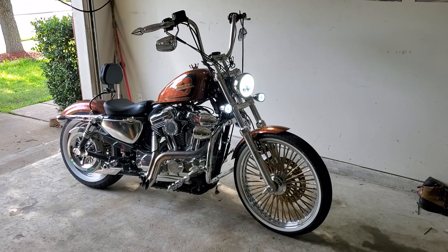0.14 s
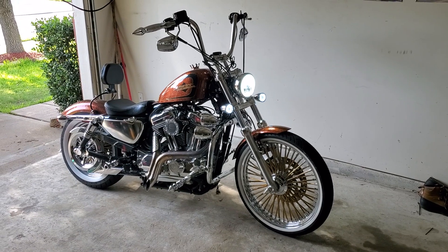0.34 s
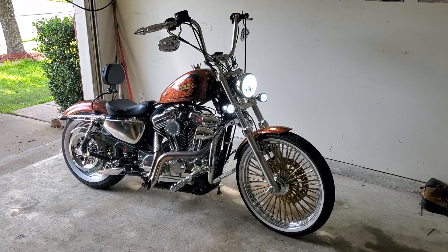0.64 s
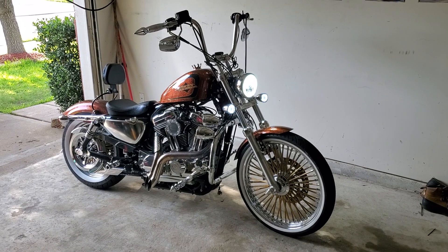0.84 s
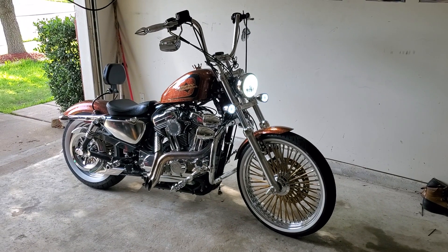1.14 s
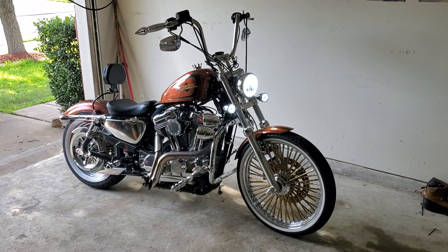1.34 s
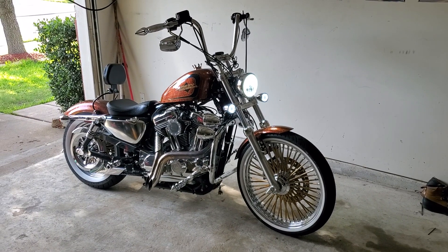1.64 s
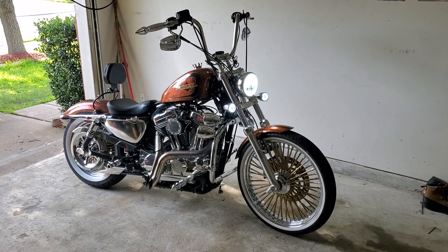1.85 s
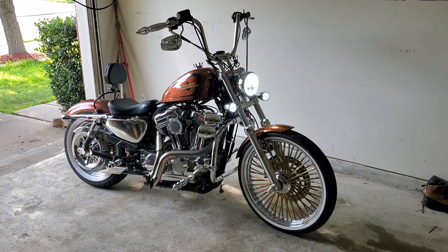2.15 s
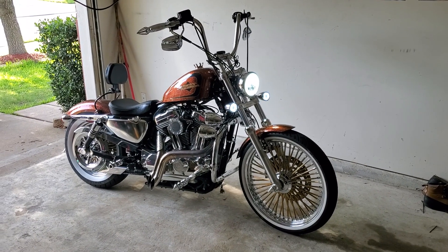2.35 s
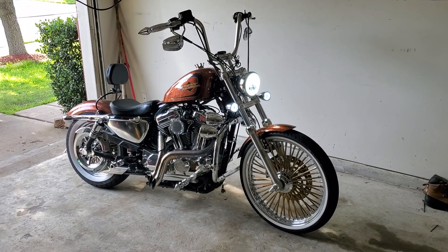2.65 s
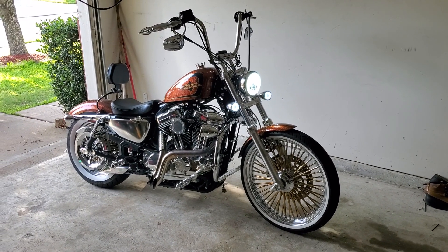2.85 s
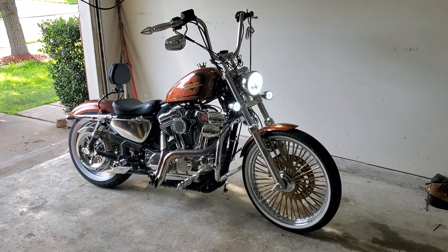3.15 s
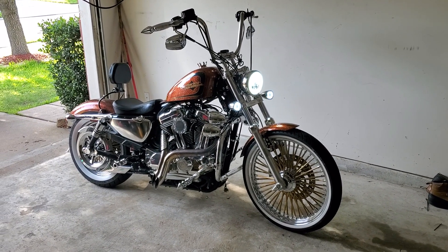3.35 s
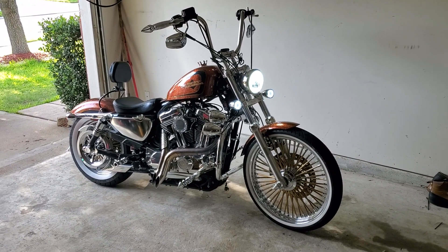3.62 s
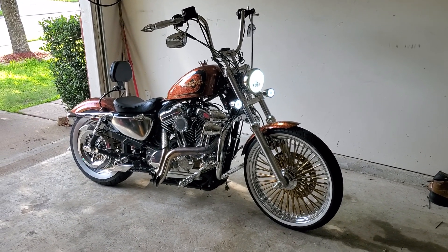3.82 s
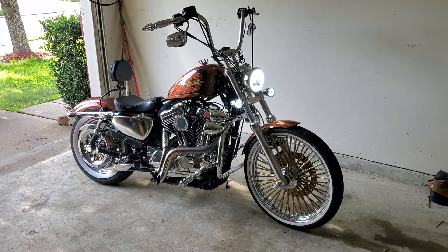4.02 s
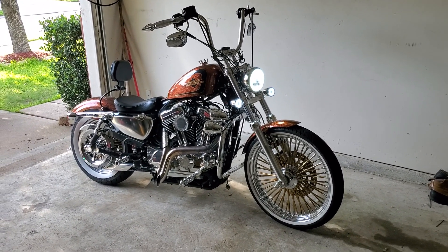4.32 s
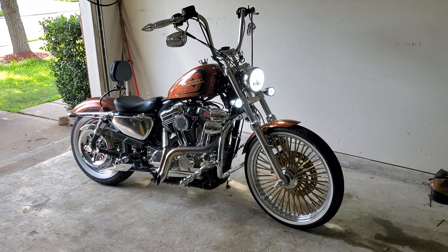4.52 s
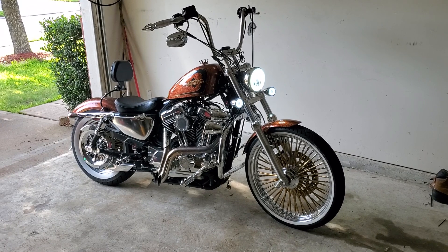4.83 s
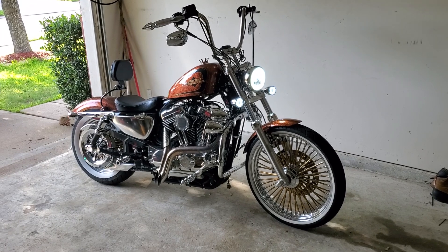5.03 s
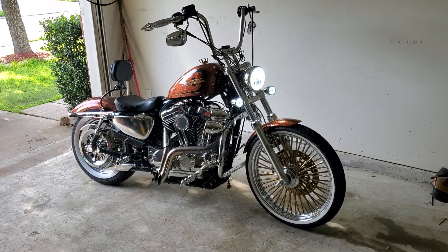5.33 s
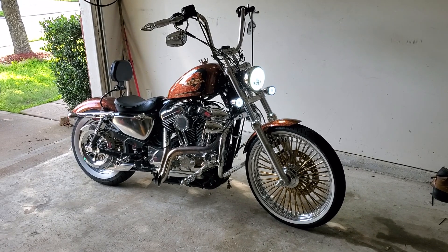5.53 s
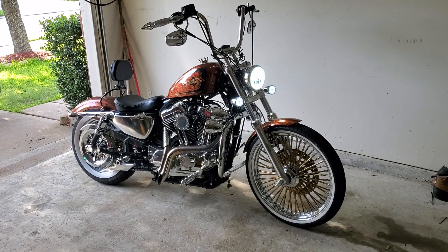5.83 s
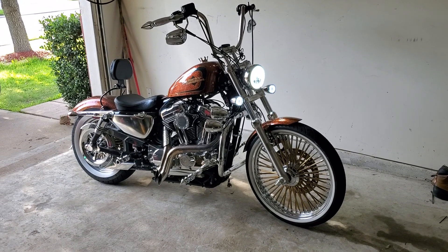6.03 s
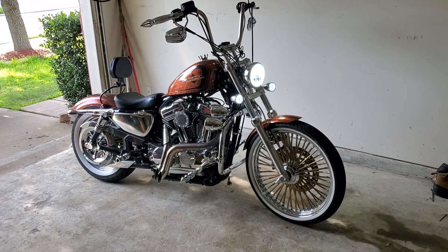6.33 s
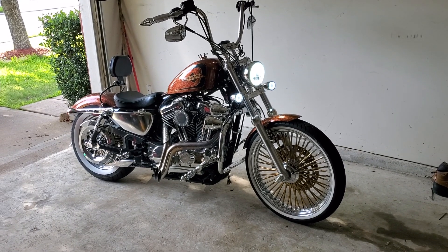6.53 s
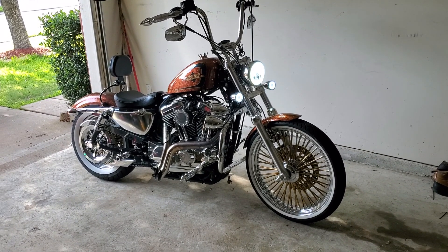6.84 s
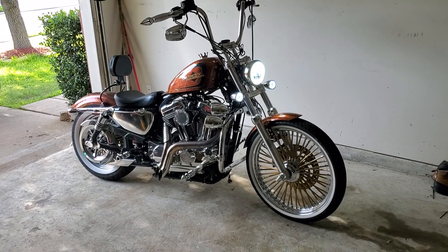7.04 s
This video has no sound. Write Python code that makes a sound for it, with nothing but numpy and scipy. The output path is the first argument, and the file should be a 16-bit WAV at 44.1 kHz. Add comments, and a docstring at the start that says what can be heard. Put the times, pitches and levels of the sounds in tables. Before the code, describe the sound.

Close, loud motorcycle idle with a lopsided galloping beat, low booming thumps, gritty pops, occasional misfires and hard metallic knocks echoing in a concrete garage.

```python
"""A big air-cooled V-twin motorcycle idles in an open garage, a few metres from two microphones.
In each cycle the front cylinder fires, then the rear: a thump rings the pipe, gas barks and cracks, metal clacks.
The walls answer within about a tenth of a second, valves tick, and late in the cycle the intake gulps; gears rustle on.
At first the rear cylinder alternates full bangs with weak firings and misses; near 4 s it has no bangs and
the front one knocks hard; from about 5 s the bangs return, and weaken towards the end."""
import sys
import numpy as np
from scipy import signal
from scipy.fft import rfft, irfft, next_fast_len
from scipy.io import wavfile
from scipy.ndimage import map_coordinates

SR = 44100
rng = np.random.default_rng(int(sys.argv[2]) if len(sys.argv) > 2 else 0)


def master_out(mix):
    """Clip the mix to full scale and print it as 16-bit PCM to the path in sys.argv[1]."""
    frames = np.transpose(np.atleast_2d(mix))
    ceiling = np.clip(frames, -1, 1)
    pcm = np.round(ceiling * 32767).astype(np.int16)
    wavfile.write(sys.argv[1], SR, pcm)


N = 316220

IDLE_RPM = 1002.84  # each cylinder fires once in two turns
VEE_DEG = 321  # crank angle by which the rear cylinder follows the front
FORCE_SCATTER_DB, THUMP_SCATTER_DB = 0.53, 1.04  # standard deviations: force, and thump alone
BOOM_LAG_S, KNOCK_LAG_S, GAS_LAG_S = -.00009, .00018, .00022  # by which the left microphone leads
TOP_HZ = 16050  # upper limit of the band

# Hunting of the idle: how far the crank runs ahead of a steady beat [t/s, lead/s]
IDLE_HUNT = [(0, .048), (.43, .0535), (.8, .054), (1.2, .051), (1.45, .053), (1.87, .047), (2, .041),
             (2.4, .0435), (3.2, .044), (3.55, .0505), (4.45, .0412), (4.72, .0418), (4.87, .038),
             (5.47, .038), (5.85, .0468), (6.18, .046), (6.88, .0575), (7.13, .0494)]
# Ordinary firing of each cylinder, relative levels [thump level/dB, bark level/dB, crack level/dB, clack level/dB]
FRONT_FIRING = (-0.54, -20, -27, -23.5)
REAR_FIRING = (-0.5, -37, -52.5, -57)
# Full bang of the rear cylinder, relative levels [thump level/dB, bark level/dB, crack level/dB, clack level/dB]
REAR_BANG = (0.94, -19.5, -23, -18.5)
# Growth per dB of force [thump dB/dB, bark dB/dB, crack dB/dB, clack dB/dB]
FORCE_STEEPENING = (.05, 1, 1.3, 2.1)
# Bangs of the rear cylinder, mostly on every second cycle [t/s, force level/dB]
REAR_BANGS = [(.008, -2.5), (0.2411, -0.5), (.476, -3.5), (0.7193, -7.5), (.956, -6), (1.077, -4.5),
              (1.317, -1), (1.5578, -1.5), (1.798, -7.5), (2.046, 0), (2.2834, -0.2), (2.521, -3),
              (2.6409, -5), (2.8815, 1), (3.239, -2.5), (3.473, -2.5), (3.712, -10), (4.921, -2.5),
              (5.158, -8), (5.278, -8), (5.5218, 0), (5.7495, 1.1), (5.9893, 2), (6.226, -1), (6.462, -3),
              (6.702, -5.5), (6.936, -12.5)]
# Spent gas left by a bang weakens the next thump of each cylinder [front change/dB, rear change/dB]
SPENT_GAS = (-0.6, -3)
# Misses of the rear cylinder, holes in the beat [t/s, change of thump level/dB]
REAR_MISSES = [(.12, -15), (.36, -4), (1.2, -8), (1.44, -14), (2.16, -6), (2.4, -27), (2.76, -12), (3, -22),
               (5.87, -5), (6.11, -11), (6.35, -19)]
# Hard knocks of the front cylinder [t/s, extra bark level/dB, extra clack level/dB]
FRONT_KNOCKS = [(.425, 3.5, 7.5), (0.547, -2.5, 5), (.904, 3, -1), (1.2658, 0.5, 5.5), (1.8674, -1.5, 6.5),
                (2.231, 3.5, -2), (2.5897, 2.5, 1), (2.8283, 1.5, 8.5), (3.4215, -1.5, 5.5),
                (3.5399, 1.5, 7), (3.902, 7, 8), (4.1426, -2.5, 10), (4.3869, 2, 4), (4.6248, 3, 3),
                (4.8686, 3.5, -2), (5.2275, -2, 5.5), (6.2932, 3, 2), (6.5294, 0.5, 6), (7.0065, 4.5, -1)]
# Puffs of the front cylinder [t/s, force level/dB]
FRONT_PUFFS = [(1.383, -1), (1.503, -4), (2.467, -8), (3.065, -4.5), (3.657, -9.5), (3.7833, -1.5),
               (5.1062, -1.5), (5.344, -8.5), (5.4698, -0.5), (5.703, -9.5), (6.179, -15), (6.883, -1.5)]
# Slow swell and sag of the thump [t/s, change of level/dB]
THUMP_SWELL = [(0, -0.3), (1.8, -0.4), (3.4, -0.7), (4, 0.2), (4.8, .8), (5.6, -1), (6.6, -0.3), (7, 1.2)]
# Resonances of the two exhaust pipes [f/Hz, width/Hz, relative level/dB]
FRONT_COLUMN = [(104.5, 29, 11.5), (137.7, 28, 11.4), (185, 13, 3.5), (245.5, 12, -1.5)]
REAR_COLUMN = [(112, 90, 7.9), (165, 71, 15.9), (177, 48, 15), (255, 13, 6.5)]
# Echoes of the thump from floor, walls and ceiling [delay t/s, gain]
WALL_ECHOES = [(0.0023, 0.58), (0.0143, 0.63), (0.0169, 0.81), (0.023, 1.2), (0.0282, 0.81), (0.0318, 0.68),
               (0.05, 0.69), (0.0561, 0.6), (0.064, 0.5), (0.0716, 0.32), (0.0766, 0.3), (0.081, 0.31),
               (0.0914, 0.19), (0.1054, 0.26)]
# Spectra of the gas noises [f/Hz, relative level/dB]
BURBLE_SPECTRUM = [(160, -21), (250, 5.5), (325, 0.5), (420, -2.5), (505, 0.5), (570, -17), (650, 4.5),
                   (900, -28)]
BARK_SPECTRUM = [(300, -20), (560, -27), (770, -10), (900, -12), (1030, -19.5), (1180, -7), (1420, -6.5),
                 (1740, 1.5), (2100, 2), (2650, -0.5), (3400, -16), (5000, -23), (9000, -31)]
CRACK_SPECTRUM = [(1800, -0.5), (3200, 5), (4200, -3), (5500, 0.5), (6300, -1), (7400, 3.5), (8900, -8),
                  (10800, 2), (13200, -7.5), (16000, -7)]
# Spectrum of the air drawn through the filter box [f/Hz, relative level/dB]
INTAKE_SPECTRUM = [(350, -42), (640, 13), (780, 28), (1000, -16), (2000, -55)]
# Spectrum of the gears and chain [f/Hz, relative level/dB]
GEAR_SPECTRUM = [(30, -6), (200, -16), (500, 11), (1000, 3.5), (2000, 9.5), (4000, -6), (7000, -4),
                 (9000, -19), (11000, -9.5), (16000, -34)]
# Modes of the cooling fins and cases [f/Hz, relative level/dB, T60 t/s]
FIN_MODES = [(1005, -30, 0.44), (1832, 8.5, 0.059), (1600, -21, 0.2), (1860, 5, .2), (2026, 10, 0.11),
             (2322, 0, 0.83), (2630, -26, 0.24)]
# Reverberation time of the garage [f/Hz, T60 t/s]
GARAGE_T60 = [(150, 1), (600, 0.75), (2000, 0.43), (6000, 0.42), (14000, 0.35)]
# Colour of the two microphones [f/Hz, left minus right level/dB]
MICROPHONES = [(80, .1), (115, 1), (170, .2), (250, -.7), (320, -2.7), (470, -2), (670, 2.5), (850, 0),
               (1020, 2), (1790, -2), (2740, 1.5), (4190, 7), (6410, 7.5), (8200, 7.5), (9810, 2.5),
               (14000, -2)]
# Slow drift of the top treble [t/s, level/dB]
TREBLE_DRIFT = [(0, -4), (1.2, -4.5), (2.501, -4), (3.799, -3), (4.8, 3), (5.8, -1.5), (6.5, -0.5),
                (7.17, -1.5)]


def firings():
    """Crank kinematics: one row [t/s, thump, bark, crack, clack level/dB] for each firing, front and rear."""
    cycle_s = 2 * 60 / IDLE_RPM
    beat = np.arange(0, N / SR + cycle_s / 2, cycle_s)
    front_s = beat - np.interp(beat, *np.transpose(IDLE_HUNT))
    rear_s = front_s + cycle_s * VEE_DEG / 720
    steepening = np.array(FORCE_STEEPENING)
    chance = rng.standard_normal((len(beat), 4))
    front = FRONT_FIRING + FORCE_SCATTER_DB * np.outer(chance[:, 0], steepening)
    rear = REAR_FIRING + FORCE_SCATTER_DB * np.outer(chance[:, 1], steepening)

    def nearest(times, s):
        """Least distance in time selects the firing."""
        return np.argmin(np.abs(times - s))

    # A later event that sets a whole firing replaces what an earlier one gave it.
    for s, force_db in REAR_BANGS:
        k = nearest(rear_s, s)
        rear_s[k] = s
        rear[k] = REAR_BANG + force_db * steepening
        front[k + 1, 0] += SPENT_GAS[0]
        rear[k + 1, 0] += SPENT_GAS[1]
    for s, hole_db in REAR_MISSES:
        rear[nearest(rear_s, s), 0] += hole_db
    for s, bark_db, clack_db in FRONT_KNOCKS:
        k = nearest(front_s, s)
        front_s[k] = s
        front[k] = np.add(FRONT_FIRING, (-1.45, bark_db, 0, clack_db))  # a knock thumps a little less
    for s, force_db in FRONT_PUFFS:
        k = nearest(front_s, s)
        front_s[k] = s
        front[k] = FRONT_FIRING + force_db * steepening

    swell_db = np.interp(beat, *np.transpose(THUMP_SWELL))
    front[:, 0] += swell_db + THUMP_SCATTER_DB * chance[:, 2]
    rear[:, 0] += swell_db + THUMP_SCATTER_DB * chance[:, 3]
    return np.column_stack([front_s, front]), np.column_stack([rear_s, rear])


def boom(front, rear):
    """Specular reflection: hard walls repeat both pipes' thumps into a rolling beat."""
    front_thumps = thumps(front, FRONT_COLUMN, db=31.5, lead_s=.002, cut_hz=55)
    rear_thumps = thumps(rear, REAR_COLUMN, db=31.5, lead_s=.0029, cut_hz=55)
    pipes = front_thumps + rear_thumps
    walls = impulses(*np.transpose(WALL_ECHOES))[:SR // 4]
    echoed = pipes + signal.fftconvolve(pipes, walls)[:N]
    return two_ears(echoed, BOOM_LAG_S) + amp(-13) * garage(pipes, build_s=.04, alike_hz=1800)


def thumps(strokes, pipe, db, lead_s, cut_hz):
    """Air-column resonance: each firing kicks the modes of a pipe whose open end radiates little deep bass."""
    s, thump_db = np.transpose(strokes)[:2]

    def radiated(f):
        """Modal sum: resonances of alternating sign, through a second-order bass cut."""
        column = 0
        for k, (centre, width, level_db) in enumerate(pipe):
            mode = 1j * f * width / (centre * centre - f * f + 1j * f * width)
            column = column + (-1) ** k * amp(level_db) * mode
        return column * (1j * f / (1j * f + cut_hz)) ** 2

    return filtered(impulses(s - lead_s, amp(thump_db + db)), radiated)


def blowdown(front, rear):
    """Jet noise: hot gas tears out as a low burble, a mid bark and a short gritty crack."""
    s, thump_db, bark_db, crack_db, _ = np.transpose(np.vstack([front, rear]))
    burble = noise(BURBLE_SPECTRUM) * bursts(s - .002, 1.27 * thump_db - 29.5, rise_s=.0025, fall_s=.0094)
    bark = noise(BARK_SPECTRUM) * bursts(s - .001, bark_db + 5.5, rise_s=.0016, fall_s=.0043)
    gritty = noise(CRACK_SPECTRUM) * grain(depth_db=4.2, rate_hz=1800)
    crack = gritty * bursts(s - .0005, crack_db + 6.5, rise_s=.0035, fall_s=.0035)
    low_tail = garage(amp(3) * burble, build_s=.0071, alike_hz=1310)
    treble = amp(2.5) * bark + amp(4.0) * crack
    high_tail = varied_tails(treble, front[:, 0], build_s=.0039, alike_hz=1110, count=12)
    return two_ears(burble + bark + crack, GAS_LAG_S) + low_tail + high_tail


def knocks(front, rear):
    """Structural resonance: firings clack in the metal; the rear's hollow knock grows faster than its bark."""
    s, _, bark_db, _, clack_db = np.transpose(np.vstack([front, rear]))
    clack = pings(s, clack_db + 6.5, hz=1735, scatter=.02, glide=.08, rise_s=.003, fall_s=.008)
    clack = clack + pings(s, clack_db + 1, hz=2030, scatter=.02, glide=.05, rise_s=.003, fall_s=.012)
    clack = clack + pings(s, clack_db, hz=1444, scatter=.019, glide=.27, rise_s=.0076, fall_s=.0034)
    clack = clack + pings(s, bark_db - 7, hz=1020, scatter=.015, glide=.1, rise_s=.002, fall_s=.008)
    rear_s, rear_bark_db = rear[:, 0], rear[:, 2]
    hollow = pings(rear_s, 1.5 * rear_bark_db + 10.5, hz=772, scatter=.016, glide=.05, rise_s=.002, fall_s=.018)
    both = clack + hollow
    back_wall = amp(-10) * filtered(both, lambda hz: delay(hz, .023))
    direct = amp(-0.5) * two_ears(both + back_wall, KNOCK_LAG_S)
    return direct + amp(-7.0) * garage(both, build_s=.004, alike_hz=1280)


def chuffs(front, rear):
    """Wave steepening: a higher chuff returns off the back wall and grows faster than the thump."""
    s, thump_db = np.transpose(np.vstack([front, rear]))[:2]
    back_wall_s = .026
    chuff = pings(s + back_wall_s, 1.6 * thump_db - 16.5, hz=205, scatter=.06, glide=.2, rise_s=.004, fall_s=.008)
    return two_ears(chuff, BOOM_LAG_S) + amp(-6) * garage(chuff, build_s=.028, alike_hz=1480)


def intake(front):
    """Flow noise: late in every cycle the engine gulps air through its filter box."""
    levels_db = np.full(len(front), -32)
    gulp = noise(INTAKE_SPECTRUM) * bursts(front[:, 0] + .081, levels_db, rise_s=.017, fall_s=.011)
    return two_ears(gulp, GAS_LAG_S) + amp(-11.5) * garage(gulp, build_s=.0058, alike_hz=1300)


def machinery(front):
    """Impact excitation: valves tick three times a cycle and ring the fins; gears and chain rustle steadily."""
    cycle = front[:, 0]
    seats = np.concatenate([cycle + .02173, cycle + .05, cycle + .096])
    seat_db = rng.normal(0, 2.5, len(seats))
    ticks = rng.standard_normal(N) * bursts(seats, seat_db, rise_s=.0007, fall_s=.002)
    t = np.arange(SR // 2) / SR
    ring = sum(amp(db - 60 * t / t60) * np.sin(2 * np.pi * hz * t) for hz, db, t60 in FIN_MODES)
    fins = amp(-36) * unit(signal.fftconvolve(ticks, ring)[:N])
    tappets = amp(-53) * unit(filtered(ticks, lambda hz: amp(along(CRACK_SPECTRUM, hz))))
    metal = fins + tappets
    gears = amp(-28.5) * noise(GEAR_SPECTRUM, channels=2)
    return metal + amp(-2.5) * garage(metal, build_s=.026, alike_hz=1300) + gears


def varied_tails(x, starts, build_s, alike_hz, count):
    """Diffuse reverberation: the treble's tail varies in fine detail by cycle, picked at random from several."""
    cycle = np.searchsorted((starts - .005) * SR, np.arange(N))
    pick = rng.integers(count, size=len(starts) + 1)[cycle]
    return sum(garage(x * (pick == k), build_s, alike_hz) for k in range(count))


def garage(x, build_s, alike_hz):
    """Diffuse field: reverberation builds up, decays by band, and is alike at both microphones in the bass."""
    hz, t, z = signal.stft(rng.standard_normal((2, SR // 2)), SR, nperseg=256)
    decay = amp(-60 * t / along(GARAGE_T60, hz)[:, None])
    z = z * decay * (1 - np.exp(-(t / build_s) ** 2))
    # This mix of middle and side gives a coherence of sinc(f / alike_hz).
    turn = np.arccos(np.sinc(hz / alike_hz))[:, None] / 2
    mid, side = signal.istft(z * np.array([np.cos(turn), np.sin(turn)]), SR, nperseg=256)[1]
    tail = np.array([mid + side, mid - side])
    return signal.fftconvolve(np.atleast_2d(x), tail / np.linalg.norm(tail[0]), axes=1)[:, :N]


def two_ears(x, lag_s):
    """Time difference of arrival: direct sound reaches the left microphone lag_s before the right."""
    return filtered(x, lambda hz: np.array([delay(hz, -lag_s / 2), delay(hz, lag_s / 2)]))


def pings(times, db, hz, scatter, glide, rise_s, fall_s):
    """Damped oscillation: each short ring glides up to a note that scatters a little in pitch."""
    t = np.arange(SR // 12) / SR
    shape = swell_and_die(t, rise_s, fall_s)
    out = np.zeros(N + SR)
    for s, level, chance in zip(times, db, rng.standard_normal((len(times), 2))):
        pitch = hz * np.exp(scatter * chance[0]) * (1 - glide * np.exp(-t / 0.0022))
        turns = np.cumsum(pitch) / SR + chance[1]  # random starting phase
        if s > 0:
            out[round(s * SR):][:len(t)] += amp(level) * shape * np.sin(2 * np.pi * turns)
    return out[:N]


def bursts(times, db, rise_s, fall_s):
    """Superposition: an envelope that swells and dies once at each time."""
    shape = swell_and_die(np.arange(SR // 10) / SR, rise_s, fall_s)
    return signal.fftconvolve(impulses(times, amp(db)), shape)[:N]


def swell_and_die(t, rise_s, fall_s):
    """Transient envelope: smooth onset and exponential decay, with peak 1."""
    shape = (1 - np.exp(-(t / rise_s) ** 2)) * np.exp(-t / fall_s)
    return shape / shape.max()


def impulses(times, gains):
    """Impulse excitation: one spike of the given size at each time."""
    return np.bincount(np.clip(np.round(times * SR).astype(int), 0, N), gains, N + 1)[:N]


def noise(spectrum, channels=1):
    """Spectral shaping: coloured noise of rms 1."""
    return unit(filtered(rng.standard_normal((channels, N)), lambda hz: amp(along(spectrum, hz))))


def grain(depth_db, rate_hz):
    """Amplitude modulation: a fast random flutter of rms 1 that breaks a hiss into crackles."""
    knots = rng.standard_normal(int(N * rate_hz / SR) + 4)
    flutter = map_coordinates(knots, [np.arange(N) * rate_hz / SR], order=1)
    return unit(amp(depth_db * flutter))


def filtered(x, response):
    """Linear filtering: the spectrum of x times a complex response of frequency."""
    size = next_fast_len(N + SR // 2)
    return irfft(rfft(x, size) * response(np.fft.rfftfreq(size, 1 / SR)), size)[..., :N]


def delay(hz, s):
    """Linear phase: the response of a pure delay."""
    return np.exp(-2j * np.pi * hz * s)


def along(points, hz):
    """Logarithmic interpolation: [f/Hz, value] points read on a log axis."""
    f, v = np.transpose(points)
    return np.interp(np.log(hz + 1), np.log(f + 1), v)


def amp(db):
    """Level law: decibels to amplitude gain."""
    return 10 ** (np.asarray(db) / 20)


def unit(x):
    """Normalisation: scale to rms 1."""
    return x / np.sqrt(np.mean(x ** 2) + 1e-20)


def scene():
    """Superposition: the whole engine in its garage."""
    front, rear = firings()
    exhaust = boom(front, rear) + chuffs(front, rear) + blowdown(front, rear)
    return exhaust + knocks(front, rear) + intake(front) + machinery(front)


def record(dry):
    """Transduction: each microphone colours the sound, the top treble drifts, peaks clip, the top is cut."""
    heard = filtered(dry, lambda hz: amp(np.outer([1, -1], along(MICROPHONES, hz)) / 2))
    top = filtered(heard, lambda hz: 1 - 1 / (1 + (hz / 7000) ** 6))
    drift = amp(np.interp(np.arange(N) / SR, *np.transpose(TREBLE_DRIFT)))
    heard = heard + top * (drift - 1)
    return filtered(np.clip(heard, -1, 1), lambda hz: hz < TOP_HZ)


dry = scene()
out = record(dry)
master_out(out)
```